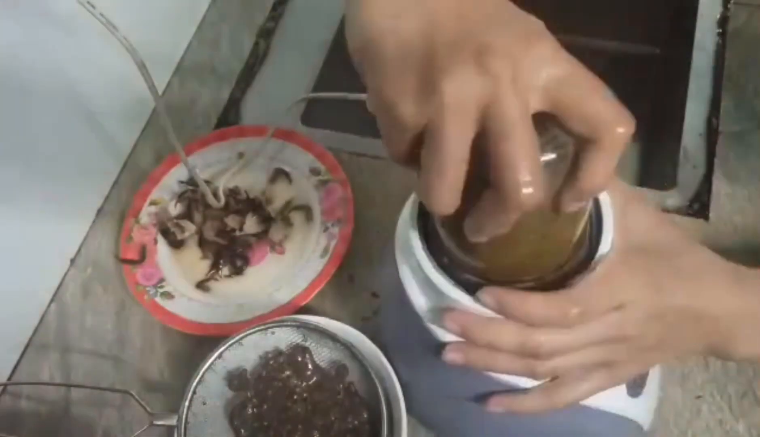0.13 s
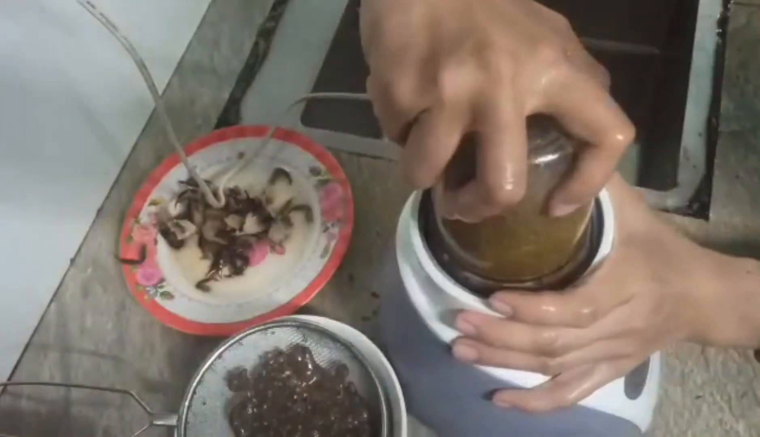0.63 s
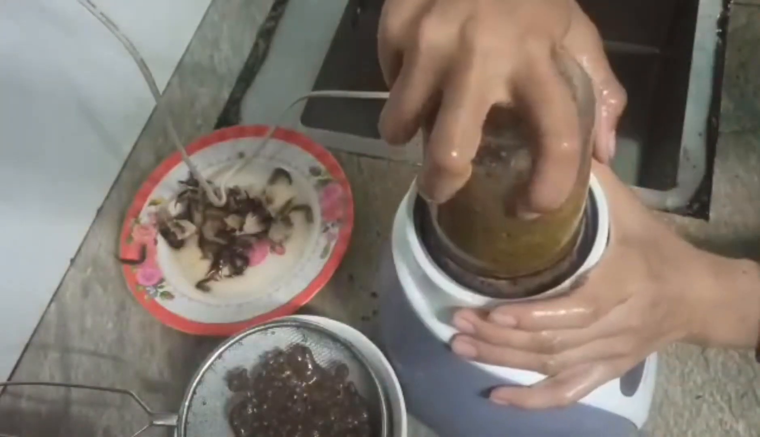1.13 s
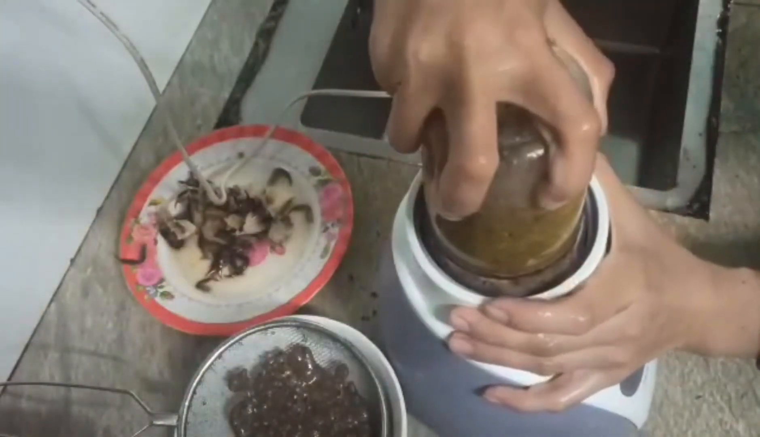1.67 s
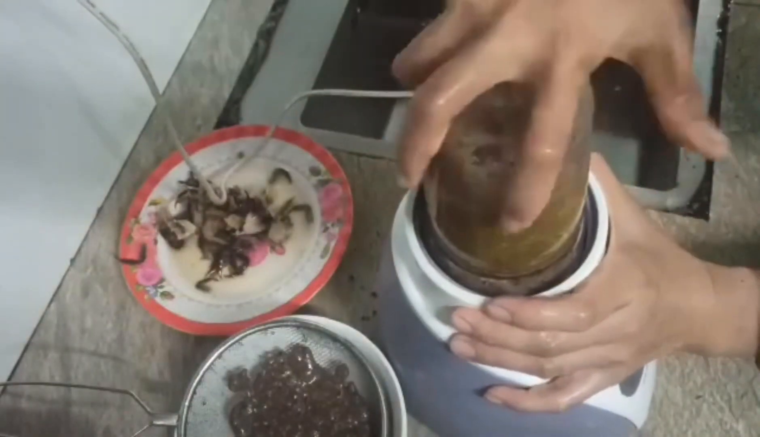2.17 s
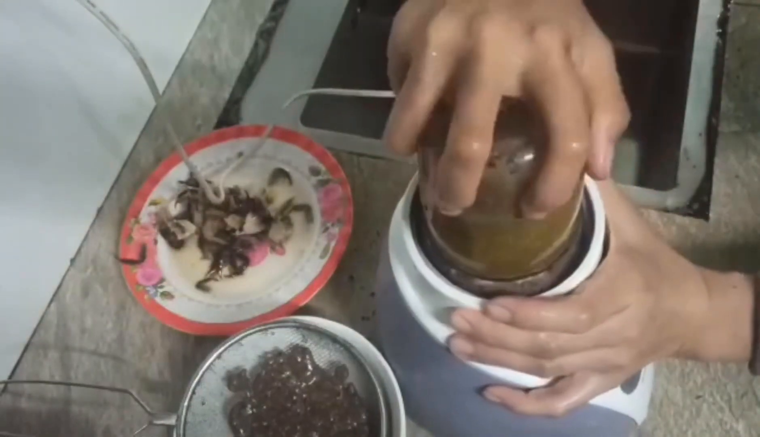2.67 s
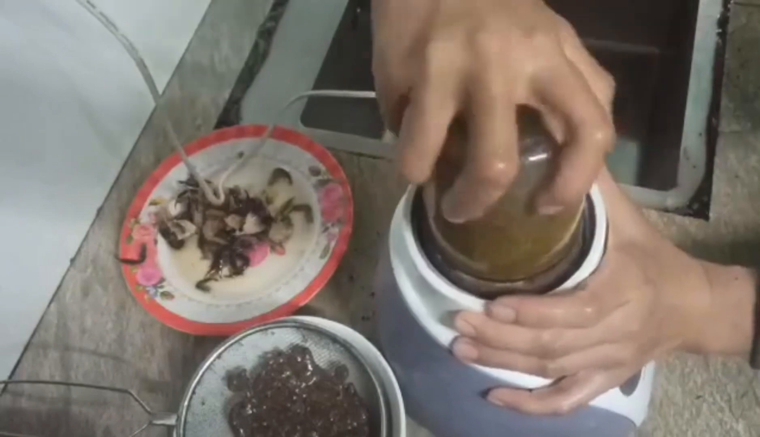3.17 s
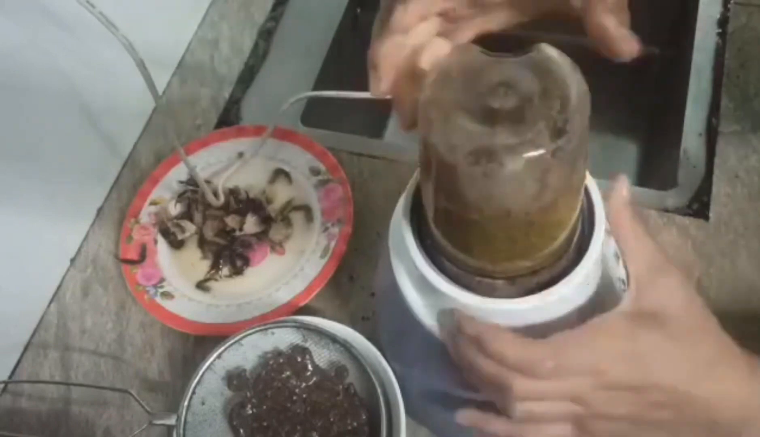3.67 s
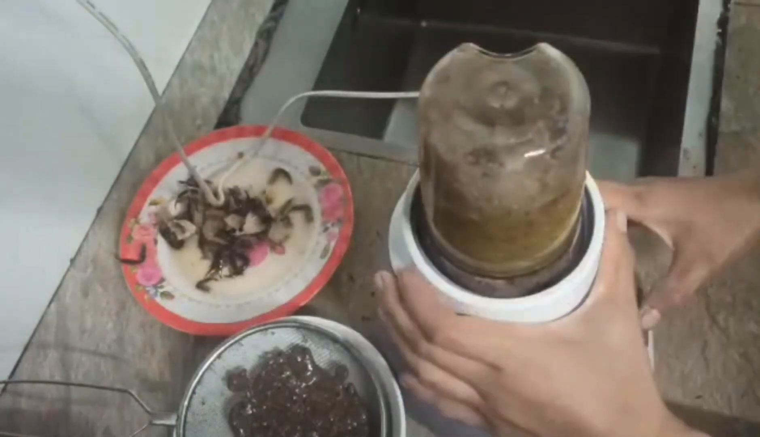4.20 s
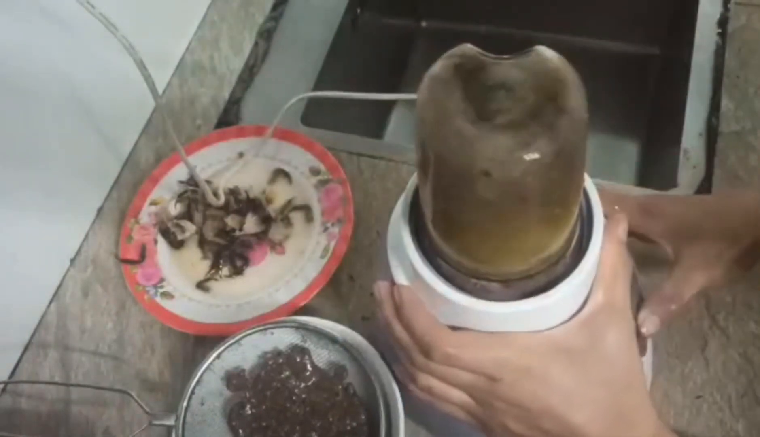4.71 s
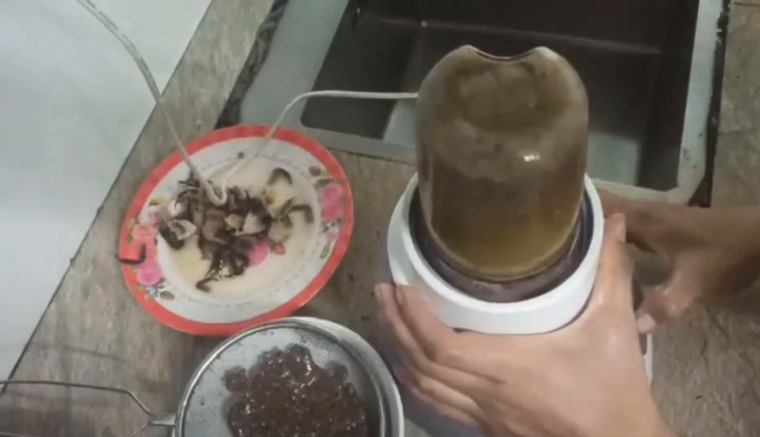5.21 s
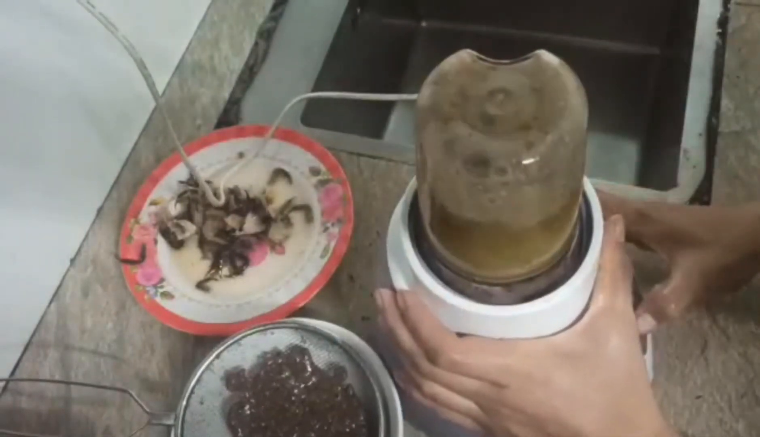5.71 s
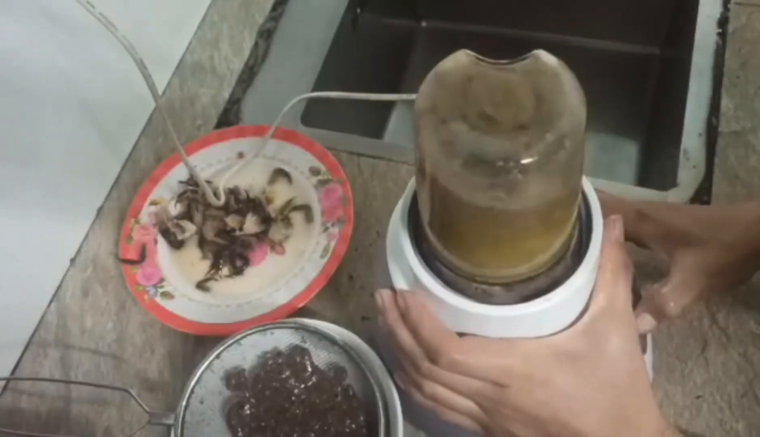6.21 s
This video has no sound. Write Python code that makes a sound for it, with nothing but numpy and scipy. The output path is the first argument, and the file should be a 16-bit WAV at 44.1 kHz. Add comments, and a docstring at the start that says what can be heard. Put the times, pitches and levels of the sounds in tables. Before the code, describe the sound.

A blender jar is rubbed, creaked and knocked into its base, the motor pulses briefly, then starts again and grinds loudly in a hard kitchen.

```python
"""A tiled kitchen with a small blender on the counter, a phone above it. Hands twist, rub and knock the jar
into its seat: short noise rattles and rubbing hiss ring jar, base, counter and collar. The motor is pulsed
once, then clicked on and left running: scattered clicks ring the shell pieces and lumps, shaped noise is the
churned water, sines are the shaft. Dense decaying noise is the hard room. Behind it, shaped noise gives hum
and hiss, wavering tones a low drone that sinks away, and falling whistles a far chick."""
import sys
import numpy as np
from scipy import signal
from scipy.fft import rfft, irfft
from scipy.io import wavfile
from scipy.ndimage import uniform_filter1d

SR = 44100
rng = np.random.default_rng(int(sys.argv[2]) if len(sys.argv) > 2 else 0)


def persist_wave(psi):
    """Save psi, clipped to +-1, as 16-bit WAV."""
    counts = np.round(np.clip(psi, -1, 1) * 32767).astype(np.int16)
    wavfile.write(sys.argv[1], SR, np.atleast_2d(counts).T)


def invert_db(level):
    """Linear amplitude ratio for a level in decibels (20 dB per decade), elementwise."""
    return 10 ** (np.asarray(level, dtype=float) / 20)


N = 280035  # length in samples

# Colour of the room air. Each row: frequency in Hz, relative level in dB.
AIR_COLOUR = [(30, -29), (70, 0), (100, 6), (135, -1.5), (170, -0.5), (400, -2), (1000, -16), (2000, -20),
              (5000, -25.5), (7500, -15.5), (14000, -10)]
# Fade of a low drone, likely a far engine. Each row: time in seconds, level in dB.
DRONE_FADE = [(0, -50), (0.15, -54), (0.3, -54.5), (0.41, -56), (0.47, -56), (0.9, -76)]
# Tones of the drone. Each row: frequency in Hz, relative level in dB.
DRONE_TONES = [(129.2, 1), (274.5, -6), (345, -5), (775, -8)]
# Far chick, one row a cheep. Each row: start in seconds, length in seconds, first pitch in Hz,
# level in dB before distance.
CHEEPS = [(0.321, 0.065, 4460, -45), (0.681, 0.06, 4430, -46), (1.353, 0.094, 4380, -58),
          (3.06, 0.069, 4200, -42.5), (4.148, 0.09, 4200, -47)]

# Room decay. Each row: band centre in Hz, time to fall 60 dB in seconds.
ROOM_DECAY = [(125, 0.71), (250, 0.69), (500, 0.52), (1000, 0.52), (2000, 0.65), (4000, 0.53), (8000, 0.37),
              (13000, 0.048)]
# Overall tone of the finished mix. Each row: frequency in Hz, gain in dB.
OVERALL_TONE = [(30, -13), (90, -1.5), (2000, -1.5), (2600, 2.5), (3300, 0), (4650, -5), (4950, -4.5),
                (6000, -6.5), (6300, 0), (8400, -11.5), (8800, -22.5), (9300, -40), (9700, -56),
                (11350, -60), (11650, -18.5), (14000, -21), (14400, -78)]

# Ring of the counter. Each row: frequency in Hz, width in Hz, relative level in dB.
COUNTER_RING = [(98.3, 20, 3.5), (127.5, 13.7, 4.5)]
# Ring of the rubber seal. Each row: frequency in Hz, width in Hz, relative level in dB.
SEAL_RING = [(2500, 78, 9.6), (2840, 63, 14), (2970, 98, 7)]
# Ring of the blender base. Each row: frequency in Hz, width in Hz, relative level in dB.
BASE_RING = [(210, 44, -4.5), (285, 23, 5.5), (351, 28, 0.5)]
# Ring of the jar. Each row: frequency in Hz, width in Hz, relative level in dB.
JAR_RING = [(450, 104, -1.5), (642.3, 30, 7), (754, 67, 2.5), (1000, 140, 1), (1364, 250, -2),
            (1647, 230, -3)]
# Ring of the shell pieces. Each row: frequency in Hz, width in Hz, relative level in dB.
SHELL_RING = [(1608, 200, 7.3), (2140, 550, 0.68), (3020, 213, 0.53), (3303, 105, 6.36), (3695, 350, 4.5),
              (4200, 420, 9.7), (4540, 510, 8)]
# Ring of hard edges. Each row: frequency in Hz, width in Hz, relative level in dB.
EDGE_RING = [(7370, 4730, 9.2), (11300, 7950, 10.9)]
# Ring of small metal parts. Each row: frequency in Hz, width in Hz, relative level in dB.
METAL_RING = [(1500, 120, -9), (2260, 60, 0), (2400, 80, -4), (3500, 150, -12)]
# Ring of the loose collar. Each row: frequency in Hz, width in Hz, relative level in dB.
COLLAR_RING = [(720, 61, 2), (1135, 33, 4), (1340, 97, -0.5)]
# Ring of the locking tab. Each row: frequency in Hz, width in Hz, relative level in dB.
TAB_RING = [(2020, 480, -8.5), (2930, 220, -5), (4200, 370, -5.5)]

# Base pushed about. Each row: time at full strength in seconds, hold in seconds, base wobble drive in dB,
# counter boom in dB relative to the wobble.
PUSHES = [(0, 0.29, -51.5, -26), (.25, 0.59, -57, -30), (.78, 0.12, -48.5, -3), (1.5, 0.433, -50.5, -13.5),
          (2.2, 0.45, -59, 4), (3.72, 0.079, -55, -21)]
# Jar twisted in its seal. Each row: time at full strength in seconds, hold in seconds, creak drive in dB.
TWISTS = [(0, 1, -53.5), (1.2, 0.22, -54), (1.5, 0.24, -47), (1.8, 0.43, -51), (2.33, 0.21, -58),
          (3.75, 0.34, -50)]
# Jar shuddering after it drops into its seat. Each row: time at full strength in seconds, hold in seconds,
# level in dB.
SHUDDERS = [(.82, 0.025, -32.5), (2.575, 0.012, -43), (3.35, 0.027, -36)]
# Fingers sliding. Each row: time at full strength in seconds, hold in seconds, rustle drive in dB.
STROKES = [(0, 0.55, -56.5), (.9, 0.8, -54.5), (1.9, 0.16, -53.5), (2.1, 0.41, -54), (2.6, 0.25, -51.5),
           (3.6, 0.54, -54.5), (4.3, 0.19, -50.5)]

# Jar knocked in its seat; the last row is the switch click. Each row: start in seconds, jar drive in dB,
# base thud in dB relative to the jar, hardness in dB relative to the jar.
KNOCKS = [(0.072, -46.5, 6, -26), (0.770, -24.5, -23, -0.5), (0.779, -26.5, -19, 0.5),
          (0.790, -19, -5.5, -1), (0.800, -15, -18, -37), (1.506, -37.5, -29, -12), (1.600, -57, 23, -15),
          (1.734, -48.5, 21, -12), (1.858, -57, 22, -8), (1.932, -62, 20, -21), (2.202, -34, 7, -14),
          (2.513, -31.5, -25, -14), (2.521, -28, -31, -20), (2.537, -28.5, -15, 8.5),
          (2.552, -23, -8.5, -8.5), (2.567, -25.5, -18, -17), (2.884, -24, 2.5, -10.5),
          (3.292, -31, -11, -18), (3.303, -26.5, -12, -6.5), (3.327, -15, -5, -13.5),
          (4.578, -37.5, 4, -11), (4.605, -15.5, 2.5, -20), (4.624, -23, -1, 4.5), (4.638, -21, -8, 2),
          (4.682, -30.5, -13, 10), (4.787, -33, 6, 4), (5.207, -44.5, 9, -7)]
# Loose collar tapping in its seat. Each row: start in seconds, drive in dB.
TAPS = [(0.069, -42.5), (0.237, -45), (0.39, -43.5), (0.516, -48), (0.724, -40), (1.207, -43), (1.269, -38),
        (1.327, -50), (1.385, -42), (1.464, -45), (1.536, -40), (1.564, -39.5), (1.638, -41),
        (1.734, -36.5), (2.149, -39.5), (2.279, -41), (2.35, -32.5), (2.38, -36.5), (3.755, -45),
        (4.014, -55)]
# Seal chirping as it lets go. Each row: start in seconds, drive in dB.
SQUEAKS = [(1.303, -55), (1.44, -51), (1.606, -49.5), (1.712, -52), (1.838, -51), (1.811, -48.5),
           (1.868, -55), (1.949, -56), (1.965, -46), (2.04, -49), (2.076, -49), (2.402, -48)]
# Locking tab snapping home. Each row: start in seconds, drive in dB.
SNAPS = [(3.327, -19)]
# Fingernail ticks on hard edges. Each row: start in seconds, drive in dB.
TICKS = [(0.162, -46), (0.193, -31.5), (0.284, -31), (0.476, -44), (0.614, -38), (0.677, -49), (4.122, -52)]
# Small metal clinks. Each row: start in seconds, drive in dB.
CLINKS = [(3.099, -58), (3.742, -47.5)]

# Motor switched. Each row: on in seconds, off in seconds, grinding drive in dB at full speed.
RUNS = [(4.603, 4.733, -22), (5.217, 6.5, -20)]
# Uneven level of the grinding. Each row: time in seconds, change of the grinding in dB.
GRIND_LEVEL = [(4.6, -3), (4.66, -2), (4.75, 2), (5.22, -3.5), (5.278, 3), (5.288, -11), (5.308, 0.5),
               (5.408, -0.5), (5.42, -9.5), (5.456, 6.5), (5.486, -6.5), (5.514, 2.5), (5.68, -0.5),
               (5.94, 0.5), (5.962, 5), (5.99, -7.5), (6.006, 2), (6.05, -3), (6.088, 2.5), (6.112, -3),
               (6.198, 1), (6.258, -5.5), (6.29, 4), (6.35, -9.5)]
# Colour of churned water. Each row: frequency in Hz, relative level in dB per Hz.
WATER_COLOUR = [(60, -46), (100, -11.5), (300, 2), (1000, 1), (2500, -13), (4000, 7.5), (8000, -23.5),
                (14000, -8.5)]

MOVE_RISE_S, MOVE_FADE_S = 0.037, 0.058  # straight rise, time constant of the fade
RATTLE_MS = 13.3  # larger is a longer rattle; its envelope falls by e in half this time
JAR_SOFT_HZ = 2240  # soft knocks and rubs ring the jar dully
SPIN_UP_S, COAST_S = 0.0012, 0.23  # the blades brake evenly in the slurry
SETTLE_DB, SETTLE_DB_PER_S = -10.5, 62  # the slurry swirls on unevenly after the blades stop
SHAFT_HZ, SHAFT_DB = 169.3, -15.5  # unbalanced shaft at full speed; drive before the glare
GROWL_DB, GROWL_SLOW_DB = -6.5, 6  # base drive in the grinding; more at low speed
BOOM_DB, BOOM_DB_PER_S = -24, -29  # counter drive in the grinding; lumps wear down
SHAKE_SPEED, SHAKE_WIDTH, SHAKE_DB = 0.43, 0.53, 24  # share of full speed where the counter shakes most
GLARE_DB_PER_S = 4  # finer shell pieces ring more and scrape the edges less


def level(x, db):
    """Scale to an rms level."""
    return x * invert_db(db) / np.sqrt(np.mean(x ** 2))


def colour(x, points):
    """Shape a sound by (Hz, dB) points, joined along log frequency."""
    hz, db = np.transpose(points)
    f = np.maximum(np.arange(len(x) // 2 + 1) * SR / len(x), 1)
    gain = invert_db(np.interp(np.log(f), np.log(hz), db))
    return irfft(rfft(x) * gain, len(x))


def band(x, hz, width):
    """One resonance, gain 1 at its centre."""
    return signal.lfilter(*signal.iirpeak(hz, hz / width, fs=SR), x)


def resonate(x, modes):
    """Resonances side by side, alternate signs."""
    return sum((-1) ** k * invert_db(db) * band(x, hz, width) for k, (hz, width, db) in enumerate(modes))


def ring(x, modes):
    """A body's resonances, scaled so that a steady hiss comes out at its own level."""
    kick = np.eye(1, 4096)[0]
    return resonate(x, modes) / np.sqrt(np.sum(resonate(kick, modes) ** 2))


def walk(rate):
    """Random levels held 1 / rate s and slewed twice; spread 1."""
    hold = int(SR / rate)
    steps = np.repeat(rng.standard_normal(N // hold + 1), hold)
    slewed = uniform_filter1d(uniform_filter1d(steps, hold), hold)
    return level(slewed[:N], 0)


def grains(rate, spread_db):
    """Scattered clicks at a mean rate per second, most small, a few large."""
    hit = rng.random(N) < rate / SR
    size = invert_db(spread_db * rng.exponential(size=N))
    return level(hit * size * rng.standard_normal(N), 0)


def moves(table):
    """One gain track per level column: each move rises, holds and fades."""
    t, out = np.arange(N) / SR, 0
    for s, hold, db, *rel_db in table:
        rise = np.clip((t - s) / MOVE_RISE_S + 1, 0, 1)
        fade = np.exp(-np.maximum(t - s - hold, 0) / MOVE_FADE_S)
        out = out + invert_db(db + np.array([0, *rel_db]))[:, None] * rise * fade
    return out


def rattles(table):
    """Each contact is a short rattle of even colour; one track per level column."""
    tracks = np.zeros((len(table[0]) - 1, N + 4096))
    t = np.arange(4096) / SR
    shape = np.exp(-t * 2000 / RATTLE_MS) * (1 - np.exp(-t / 0.0005))
    for s, db, *rel_db in table:
        i = int(s * SR)
        burst = rng.standard_normal(4096) * shape
        for _ in range(3):  # many tiny contacts average to a flat spectrum
            flat = irfft(np.exp(1j * np.angle(rfft(burst))))
            burst = shape ** 0.052 * flat
        burst = burst / np.sqrt(np.sum(burst ** 2))
        tracks[:, i:i + 4096] += invert_db(db + np.array([0, *rel_db]))[:, None] * burst
    return tracks[:, :N]


def air():
    """Low hum and hiss of the house: shaped noise, swelling a little."""
    still = colour(rng.standard_normal(N), AIR_COLOUR)
    return level(still * invert_db(0.98 * walk(4.4)), -50)


def drone():
    """A few low tones whose pitch wavers and whose level rasps."""
    t, tones = np.arange(N) / SR, 0
    for hz, db in DRONE_TONES:
        rasp = invert_db(db + 4 * walk(40))
        waver = hz * (1 + 0.02 * walk(11))
        tones = tones + rasp * np.sin(2 * np.pi * np.cumsum(waver) / SR)
    return np.sqrt(2) * tones * invert_db(np.interp(t, *np.transpose(DRONE_FADE)))


def chick():
    """Falling whistles, slightly husky from a fast random waver of the pitch."""
    out, husk_hz = 0, 190 * walk(500)
    for s, length, from_hz, db in CHEEPS:
        u = np.clip((np.arange(N) / SR - s) / length, 0, 1)  # 0 to 1 through the cheep
        hz = from_hz - 1093 * u ** 2.1 + husk_hz
        swell = np.sin(np.pi * u ** 1.7)
        out = out + invert_db(db) * swell * np.sin(2 * np.pi * np.cumsum(hz) / SR)
    return out


def room(x):
    """Dense reflections off tiles, each band dying at its own rate."""
    t, tail = np.arange(SR) / SR, 0
    for f, t60 in ROOM_DECAY:
        noise = band(band(rng.standard_normal(SR), f, 0.86 * f), f, 0.86 * f)
        tail = tail + level(noise, 0) * np.sqrt(f) * 1000. ** (-t / t60)
    tail = tail * (1 - np.exp(-t / 0.00017))  # quick build-up
    return signal.fftconvolve(x, tail / np.sqrt(np.sum(tail ** 2)))[:N]


def pushes():
    """Moving arms: small clicks boom the counter and rock the base."""
    wobble, boom = moves(PUSHES)
    counter = ring(grains(420, 0.85), COUNTER_RING) * boom
    return invert_db(0.5) * counter + ring(grains(500, 4.2), BASE_RING) * wobble


def twists():
    """Stick-slip rubbing rings jar and collar; dull clicks ring the jar as it shudders in its seat."""
    slips = uniform_filter1d(np.abs(grains(98, 0.7)), size=500)  # stick and slip in short bursts
    rub = level((slips + 0.07) * rng.standard_normal(N), 0)
    soft = signal.lfilter(*signal.butter(2, JAR_SOFT_HZ, fs=SR), rub)
    creak = ring(soft, JAR_RING) + invert_db(-9) * ring(soft, COLLAR_RING)
    shake = signal.lfilter(*signal.butter(4, 710, fs=SR), grains(1500, 1))
    shudder = level(ring(shake, JAR_RING), 0)
    return invert_db(-8) * creak * moves(TWISTS)[0] + shudder * moves(SHUDDERS)[0]


def strokes():
    """Sliding fingers: dense small clicks ring hard edges and, less, the shell resonances."""
    skin = grains(6000, 1.8)
    rustle = ring(skin, EDGE_RING) + invert_db(-11) * ring(skin, SHELL_RING)
    return rustle * moves(STROKES)[0]


def hands():
    """The counter booms under the arms, the base rocks, the jar creaks and shudders, fingers rustle."""
    return pushes() + twists() + strokes()


def small_contacts():
    """Taps, squeaks, snaps, ticks and clinks: each rattle rings its own small body."""
    taps = band(ring(rattles(TAPS)[0], COLLAR_RING), 890, 900)
    squeaks = ring(rattles(SQUEAKS)[0], SEAL_RING)
    snaps = ring(rattles(SNAPS)[0], TAB_RING)
    ticks = ring(rattles(TICKS)[0], EDGE_RING)
    clinks = ring(rattles(CLINKS)[0], METAL_RING)
    return invert_db(21.5) * taps + invert_db(16) * squeaks + invert_db(23.5) * snaps + invert_db(28.5) * (ticks + clinks)


def knocks():
    """Knocks and the switch click ring jar, base and counter; the harder, the more shell and edges crack."""
    jar, thud, hard = rattles(KNOCKS)
    soft = signal.lfilter(*signal.butter(2, JAR_SOFT_HZ, fs=SR), jar)
    body = invert_db(23) * ring(soft, JAR_RING) + invert_db(20.5) * ring(thud, BASE_RING)
    body = body + invert_db(2) * ring(jar, COUNTER_RING)
    crack = ring(hard, SHELL_RING) + invert_db(9.5) * ring(hard, EDGE_RING) + invert_db(-14.5) * hard
    return body + invert_db(25.5) * crack


def blade_speed(on, off, settle):
    """Share of full speed: a quick start from half, an even braking, then the slurry swirling on."""
    t = np.arange(N) / SR
    start = 1 - 0.5 * np.exp(-np.maximum(t - on, 0) / SPIN_UP_S)
    blades = (t > on) * start * np.clip(1 - (t - off) / COAST_S, 0, 1)
    swirl = (t > off) * invert_db(SETTLE_DB - (t - off) * SETTLE_DB_PER_S) * settle
    return np.maximum(blades, swirl)


def blender():
    """Shell pieces tick on the jar, lumps jolt the base, water churns, shaft and counter hum, all unevenly."""
    ticks, lumps = grains(6000, 1.64), grains(500, 3.1)
    pieces, edges = ring(ticks, SHELL_RING), invert_db(1) * ring(ticks, EDGE_RING)
    jar = invert_db(-6) * ring(ticks, JAR_RING)
    base, counter = ring(lumps, BASE_RING), ring(lumps, COUNTER_RING)
    flutter = invert_db(1.2 * walk(75))
    water = level(colour(rng.standard_normal(N), WATER_COLOUR), -6.5) * invert_db(1.5 * walk(40))
    out, t = 0, np.arange(N) / SR
    uneven_db = walk(80) + np.interp(t, *np.transpose(GRIND_LEVEL))
    settle = invert_db(3 * walk(45))
    wobble = 1 + 0.012 * walk(12)  # uneven turning
    for on, off, db in RUNS:
        ran = np.maximum(t - on, 0)
        speed = blade_speed(on, off, settle)
        growl_db = GROWL_DB + GROWL_SLOW_DB * (1 - speed)
        shake_db = SHAKE_DB * np.exp(-((speed - SHAKE_SPEED) / SHAKE_WIDTH) ** 2)
        boom_db = BOOM_DB + BOOM_DB_PER_S * ran + shake_db
        glare = invert_db(GLARE_DB_PER_S * (np.minimum(ran, 1.2) - 1.77))
        shell = flutter * (pieces * glare + edges / glare)
        turn = 2 * np.pi * np.cumsum(SHAFT_HZ * speed * wobble) / SR
        # the shaft comes clearer as the slurry thins
        shaft = invert_db(SHAFT_DB) * glare ** 3 * (np.sin(turn) + np.sin(2 * turn))
        low = invert_db(growl_db) * base + invert_db(boom_db) * counter + shaft
        out = out + speed * invert_db(db - 2.5 + uneven_db) * (invert_db(4) * shell + water + jar + low)
    return out


def scene():
    """Near sounds reach the phone direct and by the walls, the chick mostly by the walls."""
    bird, touch, blows, motor = chick(), hands(), knocks() + small_contacts(), blender()
    walls = room(invert_db(-6.5) * bird + invert_db(-6) * touch + invert_db(-9.5) * blows + invert_db(-11) * motor)
    direct = invert_db(-28) * bird + touch + blows + motor
    return (air() + drone() + direct + walls)[None]


def top_cut(x):
    """Nothing passes above the cut-off."""
    return signal.sosfilt(signal.butter(12, 15120, fs=SR, output="sos"), x)


def record(dry):
    """Loud peaks are rounded off and the overall tone is set."""
    soft = np.tanh(1.135 * dry[0]) / 0.93
    mix = colour(soft, OVERALL_TONE)[None]
    return top_cut(mix)


dry = scene()
out = record(dry)
persist_wave(out)
```